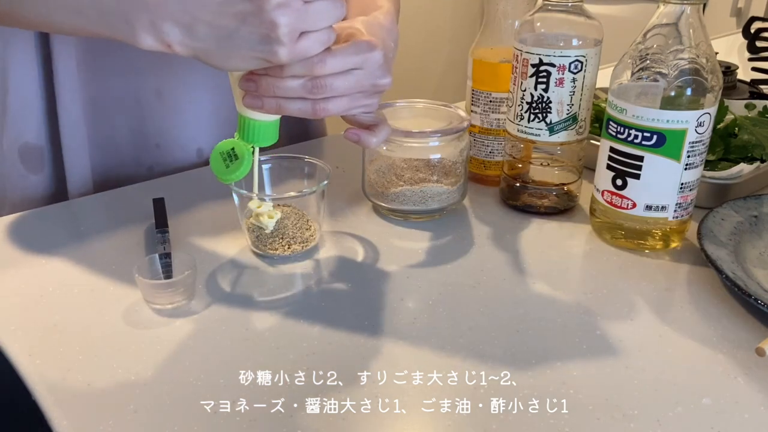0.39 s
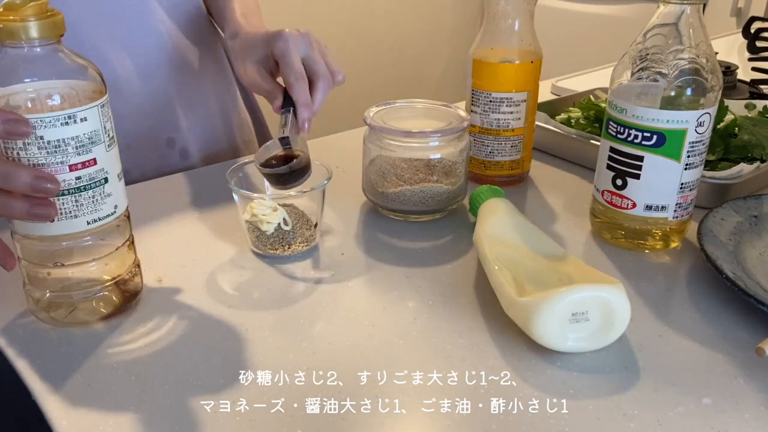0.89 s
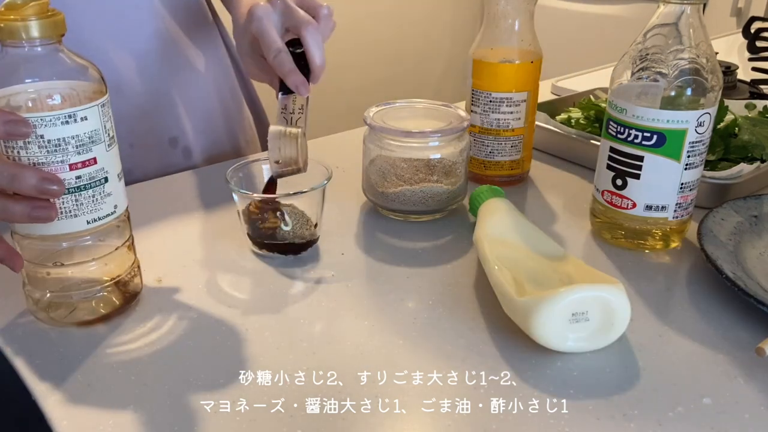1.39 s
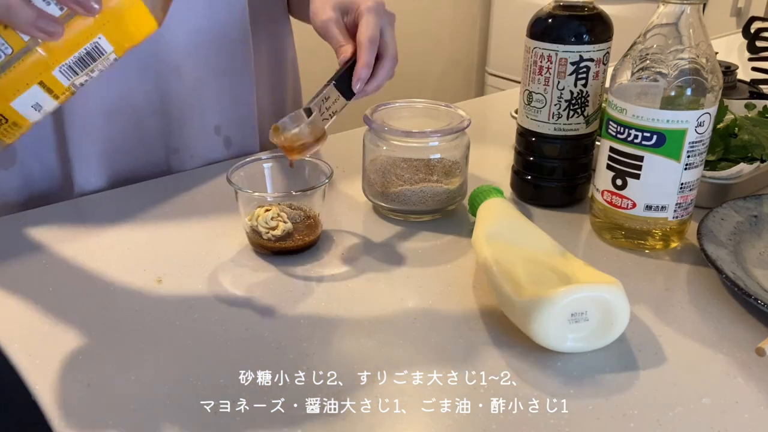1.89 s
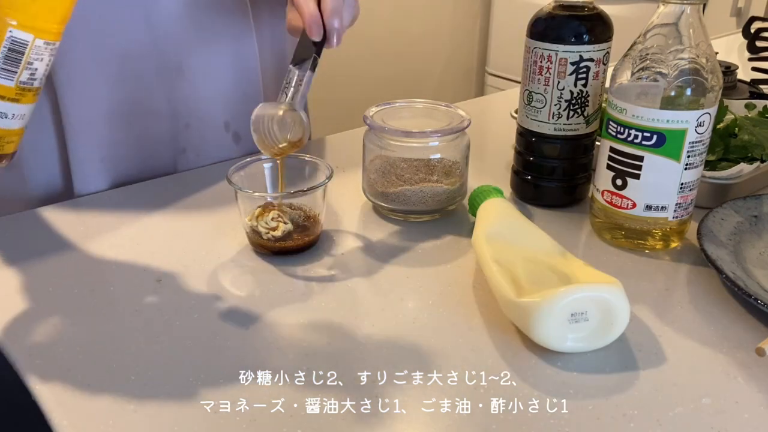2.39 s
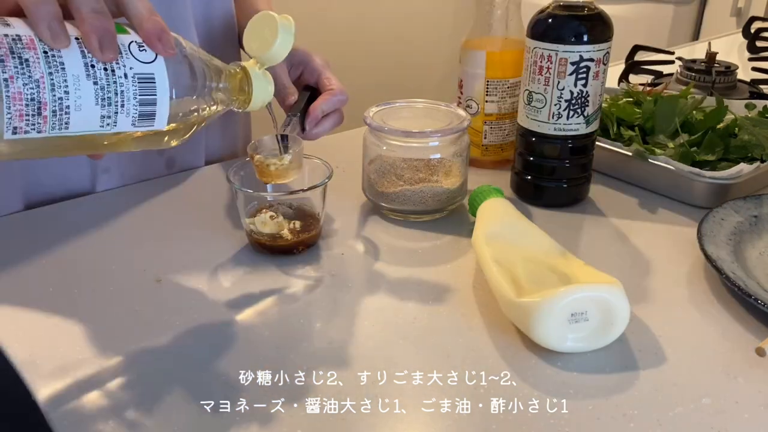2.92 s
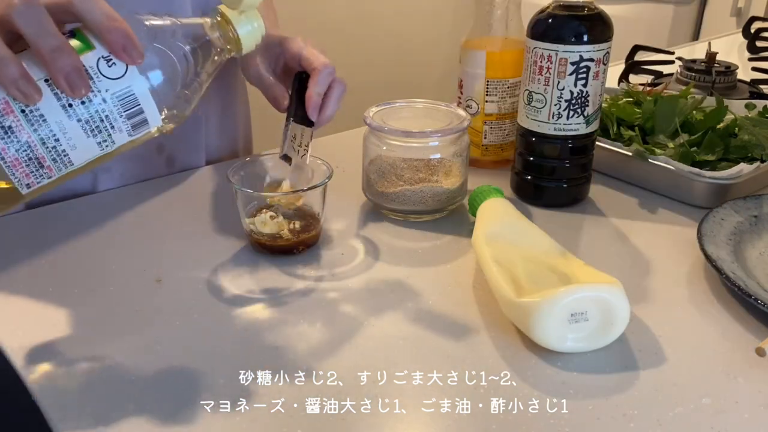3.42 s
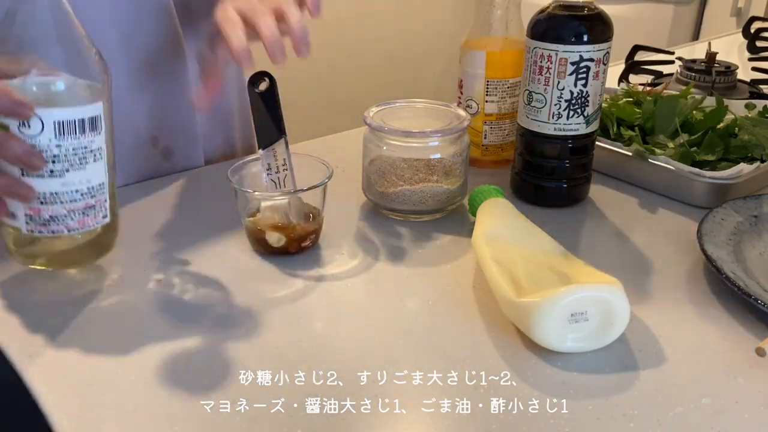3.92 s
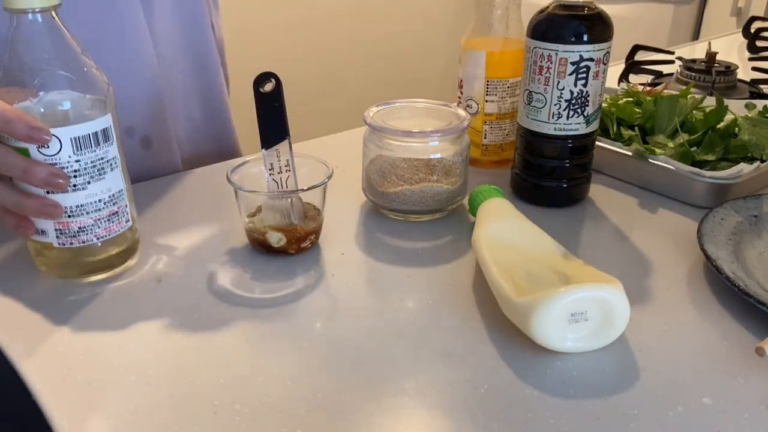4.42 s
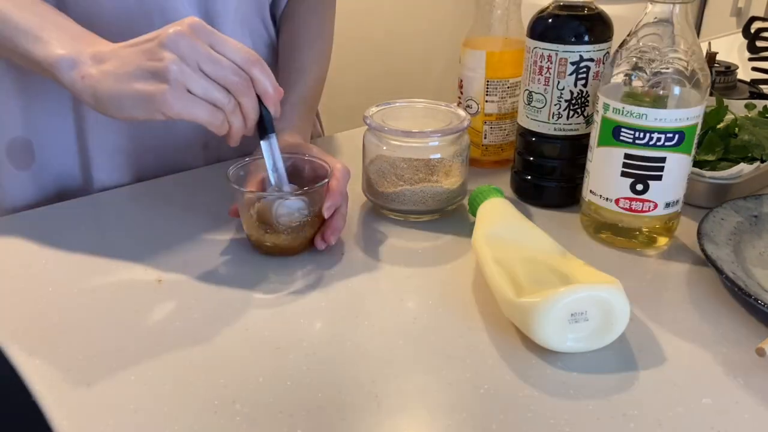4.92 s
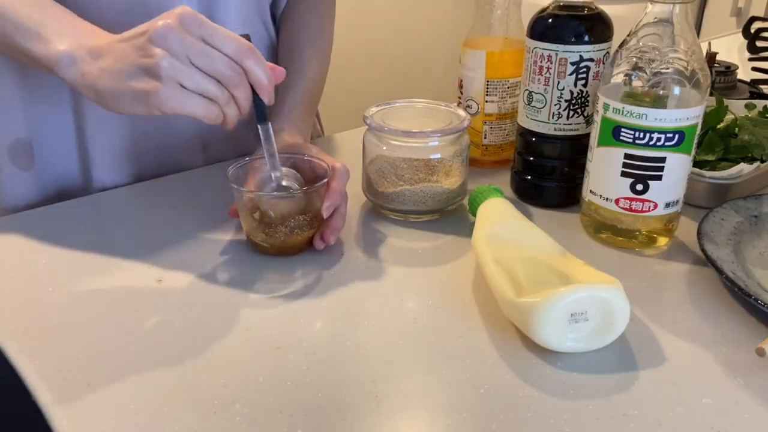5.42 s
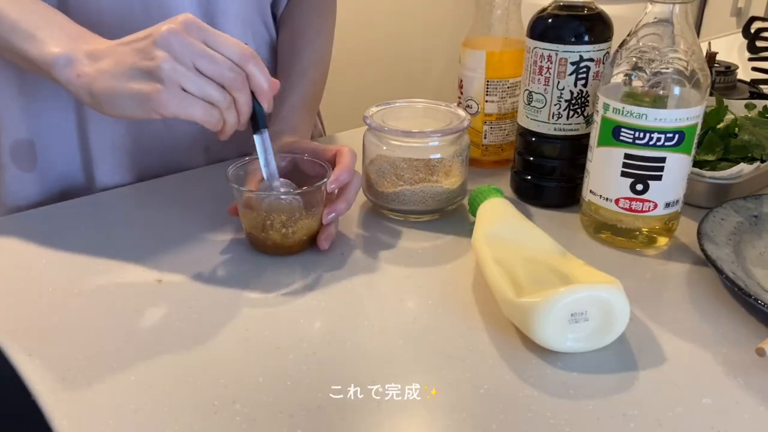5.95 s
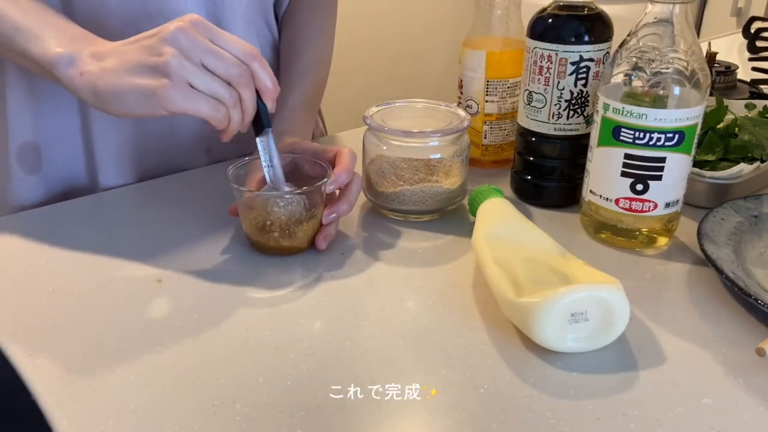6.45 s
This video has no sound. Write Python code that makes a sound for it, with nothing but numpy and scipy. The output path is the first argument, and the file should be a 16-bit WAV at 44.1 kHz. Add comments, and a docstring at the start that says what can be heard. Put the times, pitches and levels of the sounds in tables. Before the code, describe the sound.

A close stereo microphone hears a small, quiet kitchen with low bassy hum and a faint distant midrange wash. For the first 0.9 s there is little else. The background then steps down; a soft pouring hiss trickles away until about 1.6 s, with tiny ticks and a light spoon tap on glass at 1.7. After another cut at 1.9, faint pouring swells from 2.35, ending in a bright double knock at 2.83. A softer tap comes at 3.15 and a crisp clink at 3.75. At 4.02 a bottle lands with a loud, woody thud; at 4.4 it lands again, bouncing quickly to rest, with a faint jar ring. The ringing is chopped at 4.62 as the background rises. Gentle wet stirring and scraping continues to 6.5, with irregular glass clinks, strongest near 5.3-5.4 and 5.7, weaker taps near 6.1, 6.35 and the end.

```python
"""A measuring spoon knocks and stirs in a small glass cup on a kitchen counter: short rattles plus glass modes.
A bottle is set down twice, with bounces: the same model with modes of the counter and a neighbouring jar.
Shaped noise makes the pouring, stirring and quiet kitchen hum; faint ticks are decaying sines.
Five passages follow each other: hum and wash step in level, and what still rings is chopped off.
A close pair of microphone ports hears it all."""
import sys
import numpy as np
from scipy import signal
from scipy.fft import rfft, irfft, next_fast_len
from scipy.io import wavfile
from scipy.ndimage import uniform_filter1d

SR = 44100
rng = np.random.default_rng(int(sys.argv[2]) if len(sys.argv) > 2 else 0)


def how_loud(loudness_db):
    """Turn decibels into a plain amplitude multiplier (0 dB gives 1, 20 dB gives 10)."""
    steps = np.asarray(loudness_db, float) / 20
    return 10 ** steps


def transcribe(signal):
    """Save signal, clipped to [-1, 1], as a 16-bit WAV file at the path in sys.argv[1]."""
    frames = np.atleast_2d(signal).T
    limited = np.clip(frames, -1, 1)
    pcm = np.round(limited * 32767).astype(np.int16)
    wavfile.write(sys.argv[1], SR, pcm)


N = 289737


def evened(x):
    """Scales to rms 1."""
    return x / np.sqrt(np.mean(x ** 2) + 1e-20)


def read(points, hz):
    """Interpolates a (Hz, value) table on a log-frequency axis."""
    f, value = np.transpose(points)
    return np.interp(np.log(hz + 1), np.log(f + 1), value)


def diffuse(size, spectrum, patchy_db):
    """Noise from all sides: the ports agree only in part, band by band; its level drifts in patches."""
    # likeness of the ports: freq_hz, likeness [0-1]
    port_likeness = [(60, 1), (160, 0.97), (270, 0.99), (450, 0.11), (800, 0.19), (1500, 0.37),
                     (3300, 0.31), (6000, 1), (9000, 0.71)]
    frames, hz = size // 256 + 5, np.fft.rfftfreq(1024, 1 / SR)
    a, b, c, d, patches = rng.standard_normal((frames, 513, 5)).T
    patches = uniform_filter1d(patches, size=12, axis=0)
    patches = evened(uniform_filter1d(patches, size=14, axis=1))
    same = np.clip(read(port_likeness, hz), -1, 1)[:, None]
    left = a + 1j * b
    right = same * left + np.sqrt(1 - same ** 2) * (c + 1j * d)
    z = np.array([left, right]) * how_loud(read(spectrum, hz)[:, None] + patchy_db * patches)
    return evened(signal.istft(z, nperseg=1024, noverlap=768)[1][:, :size])


def room(wet_db):
    """Response: direct sound, then a diffuse tail whose bands die at their own speed."""
    # reverberation: freq_hz, t60_s
    room_t60 = [(60, 0.59), (200, 0.4), (1000, 0.33), (4000, 0.37), (8000, 0.36), (16000, 0.1)]
    size = SR // 2
    hz, t, z = signal.stft(diffuse(size, [(20, 0.017), (20000, 0.0043)], 0), SR, nperseg=256)
    decay = how_loud(-60 * t / read(room_t60, hz)[:, None])
    tail = signal.istft(z * decay, SR, nperseg=256)[1][:, :size]
    tail = tail * np.clip(np.arange(size) / SR / 0.0018 - 1, 0, 1)  # first walls answer after a few ms
    tail = how_loud(wet_db) * tail / np.linalg.norm(tail[0])
    tail[:, 0] = 1  # direct sound
    return tail


def kitchen_hum(hum_db):
    """Low steady hum: diffuse noise weighted to the bass, at the level given per sample."""
    # spectrum: freq_hz, level_db
    hum_spectrum = [(25, -31.5), (38, -3), (50, 3), (120, -5.5), (200, -11), (300, -12.5), (420, -13),
                    (640, -28.5), (1100, -32), (1700, -40), (2400, -40), (3600, -46.5), (6500, -51),
                    (12000, -56.5), (16000, -74)]
    return how_loud(hum_db) * diffuse(N, hum_spectrum, 1.5)


def distant_wash(wash_db):
    """Distant midrange wash: diffuse noise at the level given per sample."""
    # spectrum: freq_hz, level_db
    wash_spectrum = [(200, -11.5), (500, 3.5), (1000, 0.5), (1600, -12.5), (3000, -34.5), (6000, -37.5)]
    return how_loud(wash_db) * diffuse(N, wash_spectrum, 1.5)


def appliance_tones():
    """Narrow bands of noise: appliance tones that waver."""
    # tones: pitch_hz, level_db, width_hz
    tone_bands = [(126, -66, 10), (180, -69, 10), (402, -77, 8), (542, -82, 8), (3750, -100, 110),
                  (5950, -106, 50)]
    hz = np.fft.rfftfreq(N, 1 / SR)
    total = 0
    for pitch_hz, level_db, width_hz in tone_bands:
        noise = rfft(diffuse(N, [(20, 0), (20000, 0.056)], 0))
        band = np.exp(-((hz - pitch_hz) / width_hz) ** 2)
        total = total + how_loud(level_db) * evened(irfft(noise * band, N))
    return total


def rustle():
    """Grains and liquid: scrape and finer fizz; strokes rise fast, hold and fade over pouring and stirring."""
    # scrape spectrum: freq_hz, level_db
    scrape_spectrum = [(300, -31), (750, 2), (1400, -5), (1900, -8), (2350, 7), (2900, -11.5), (4100, -9),
                       (5500, -18), (8000, -34)]
    # fizz spectrum: freq_hz, level_db
    fizz_spectrum = [(4000, -27), (6000, 0.5), (9000, -1.5), (11500, 3), (14000, -0.5), (16000, 7.5)]
    # short strokes of hand or spoon: start_s, hold_s, scrape_db, fizz_db
    strokes = [(0.923, 0.0027, -73, -72.5), (1.583, 0.0042, -74.5, -60), (2.596, 0.076, -78, -77.5),
               (3.16, .005, -61, -100), (4.646, 0.022, -69, -77), (4.746, .01, -71, -100),
               (4.821, 0.076, -67.5, -82), (5.032, 0.019, -61, -71), (5.114, 0.0054, -63, -73),
               (5.455, 0.022, -74, -86), (5.856, 0.03, -78, -105), (5.985, 0.0067, -70, -68),
               (6.266, 0.0041, -75, -80), (6.338, 0.039, -64.5, -74), (6.522, 0.012, -74.5, -75)]
    # pouring that trickles off, pouring that swells, then a steady bed of stirring:
    # start_s, end_s, first_db, last_db
    pouring_and_stirring = [(0.913, 1.56, -71.5, -96.5), (2.347, 2.921, -87, -76.5),
                            (4.621, 6.57, -84, -86)]
    rise_db_per_s, scrape_fall_db_per_s, fizz_fall_db_per_s = 900, 235, 420
    bed_fizz_db, still_fizz_db = -14.5, -108  # against the bed's scrape; constant floor

    t = np.arange(N) / SR
    bed = 0
    for start_s, end_s, first_db, last_db in pouring_and_stirring:
        level_db = np.interp(t, [start_s, end_s], [first_db, last_db])
        bed = bed + how_loud(level_db) * (t >= start_s) * (t < end_s)
    scrape_power = bed ** 2
    fizz_power = (bed * how_loud(bed_fizz_db)) ** 2 + how_loud(still_fizz_db) ** 2
    for start_s, hold_s, scrape_db, fizz_db in strokes:
        before_s = np.maximum(start_s - t, 0)
        after_s = np.maximum(t - start_s - hold_s, 0)
        rise_db = -rise_db_per_s * before_s
        scrape_power = scrape_power + how_loud(scrape_db + rise_db - scrape_fall_db_per_s * after_s) ** 2
        fizz_power = fizz_power + how_loud(fizz_db + rise_db - fizz_fall_db_per_s * after_s) ** 2
    grain = how_loud(0.7 * evened(uniform_filter1d(rng.standard_normal(N), size=300)))
    scrape = np.sqrt(scrape_power) * diffuse(N, scrape_spectrum, 1.6)
    fizz = np.sqrt(fizz_power) * diffuse(N, fizz_spectrum, 2.1)
    return grain * (scrape + fizz)


def ticks():
    """Tiny clicks, each ringing for a few cycles."""
    # faint ticks: start_s, level_db, pitch_hz
    tick_rows = [(0.919, -64, 3980), (1.394, -58, 5760), (1.58, -44.5, 11300), (1.889, -53.5, 12000),
                 (2.628, -62, 10700), (2.992, -58.5, 5470), (3.29, -71.5, 13000), (3.378, -61, 6330),
                 (3.381, -68.5, 5250), (5.628, -64.5, 10900), (6.264, -55.5, 12230), (6.366, -57, 11000),
                 (6.385, -64, 11000), (6.449, -73, 11500), (6.505, -64, 11100), (6.521, -60, 11660),
                 (6.535, -65.5, 11700)]
    t = np.arange(400) / SR
    for start_s, level_db, pitch_hz in tick_rows:
        cycles = np.exp(-t * pitch_hz / 5.0) * np.sin(2 * np.pi * pitch_hz * t)
        yield start_s, how_loud(level_db) * (cycles + 0.58 * (t == 0)), 0


def blows(rows, colour, modes, burst_s, spread_s, bump_db, bass_db, upper_db):
    """Each blow is a short rattle, treble first as bending waves spread, plus the ringing of the given modes."""
    held_from_s = 4.62  # from here a hand holds the cup
    upper_per_treble = .45  # dB per dB: a brighter contact excites the upper modes more, until held
    even = .45  # share of the rattle's chance peaks levelled out, so few stray notes linger in the room
    lead_in, burst_size = 100, 2000  # samples

    t, hz = np.arange(SR // 2) / SR, np.fft.rfftfreq(SR // 2, 1 / SR)
    # delay = spread_s * (sqrt(500 / hz) - 1 / 6)
    late = np.exp(-4j * np.pi * spread_s * (np.sqrt(500 * hz) - hz / 12))
    bass = 1 / (1 + (hz / 450) ** 2)
    treble = 1 / (1 + (3500 / (hz + 1)) ** 2)
    apart_s = np.array([[.00001], [-.00001]])  # the ring reaches one port a little earlier
    times = np.array([row[0] for row in rows] + [N])  # N: no further contact
    chance = rng.standard_normal((len(rows), burst_size + len(modes)))
    for (start_s, peak_db, centre_hz, treble_db, ring_db), z in zip(rows, chance):
        bump = np.exp(-(np.log2((hz + 1) / centre_hz) / .32) ** 2)
        deep = np.log2(1500 / centre_hz)  # a duller blow carries more bass
        shape_db = read(colour, hz) + bump_db * bump + bass_db * deep * bass + treble_db * treble
        burst = np.pad(z[:burst_size] * np.exp(-t[:burst_size] / burst_s), (lead_in, 0))
        burst[lead_in] = 4.46  # the first contact is a sharp click
        rattle = rfft(burst, len(t))
        rattle = rattle / (abs(rattle) + 1) ** even
        burst = irfft(rattle * late * how_loud(shape_db), len(t))[:4096]
        burst = burst * np.clip((np.arange(4096) - 85) / 12, 0, 1)  # silence before the contact
        burst = burst / abs(signal.hilbert(burst)).max()

        held = int(start_s > held_from_s)
        ring = 0
        for (pitch_hz, mode_db, t60_s), chance_db in zip(modes, z[burst_size:]):
            level_db = mode_db + ring_db + chance_db
            if pitch_hz > 3000:
                level_db += upper_db[held] + upper_per_treble * treble_db * (1 - held)
            damping = 1.5 if held and pitch_hz < 3000 else 1  # fingers quieten the lowest modes
            decay = how_loud(level_db - 60 * t / t60_s * damping)
            ring = ring + decay * np.sin(2 * np.pi * pitch_hz * (t + apart_s))
        touched_s = times[times > start_s + .03][0] - start_s  # the next contact stops the ring
        ring = ring * (1 - np.exp(-t / .002)) * np.exp(-np.maximum(t - touched_s, 0) / 0.0016)
        ring = np.pad(ring, ((0, 0), (lead_in, 0)))[:, :len(t)]
        yield start_s - lead_in / SR, how_loud(peak_db) * burst, how_loud(peak_db) * ring


def spoon_knocks():
    """Spoon on glass: bright rattles and the cup's modes, the upper ones weaker once it is held."""
    # knocks: start_s, peak_db, centre_hz, treble_db, ring_db (against the peak)
    knock_rows = [(1.716, -34.5, 1260, 33, -23.5), (1.721, -38, 700, -37, -12.5),
                  (2.831, -18.5, 2390, 2, -16.5), (2.841, -20.5, 780, 16, -33), (2.85, -30, 935, 2, -36),
                  (3.149, -31, 730, -17.5, -22), (3.243, -55.5, 3360, 12, -38),
                  (3.751, -25, 2035, 12.5, -28.5), (3.756, -27.5, 753, 0, -37.5),
                  (4.742, -49, 705, -8, -28), (4.866, -52, 1600, -22, -13), (5.046, -52.5, 1405, -13, -28),
                  (5.11, -45.5, 750, -1, -45), (5.124, -44, 730, -12, -40), (5.298, -31.5, 2270, 29, -12),
                  (5.303, -31, 820, -11, -36), (5.377, -22, 1930, 16.5, -14), (5.399, -39.5, 664, -1, -20),
                  (5.634, -40, 2550, -18.5, -42), (5.69, -22.5, 2020, 10.5, -9.5),
                  (5.697, -30, 2140, 15, -47), (5.752, -20, 2560, -3, -28), (5.983, -41, 792, -18, -28),
                  (6.079, -38.5, 1320, 33.5, -28), (6.099, -42, 781, 2, -15), (6.331, -37, 1900, 29.5, -28),
                  (6.364, -47.5, 1753, -57.5, -27), (6.565, -39, 718, 10, -20)]
    # rattle spectrum: freq_hz, level_db
    knock_colour = [(100, -26), (250, 10), (700, 9), (1500, 5.5), (2400, -5.5), (3500, -15), (6000, -24),
                    (9000, -33.5), (12000, -37.5), (16000, -37)]
    # modes of the free cup: pitch_hz, level_db, t60_s
    glass_modes = [(1577, 0, .33), (1609, -4, .2), (2075, -7, .14), (2390, -10, .17), (4279, -2, .12),
                   (4287, -4, .33), (4328, -7, .28), (7960, -22, .1), (8045, -19, .22), (12620, -30, .15)]
    return blows(knock_rows, knock_colour, glass_modes, burst_s=0.005, spread_s=0.0032,
                 bump_db=12.0, bass_db=9.7, upper_db=[0, -10])  # free, held


def bottle_thuds():
    """Bottle set down, with bounces: dull rattles, the counter's low modes, and a jar near 3.9 kHz."""
    # thuds: start_s, peak_db, centre_hz, treble_db, ring_db (against the peak)
    thud_rows = [(4.024, -6.5, 756, 0.5, -18.5), (4.032, -18, 479, -12, -25),
                 (4.251, -40.5, 374, -13.5, -7.5), (4.373, -49.5, 451, -20.5, -26),
                 (4.4, -7.5, 560, 7, -20), (4.409, -12.5, 500, -27, -14.5),
                 (4.432, -14.5, 596, -13.5, -12.5), (4.474, -20, 450, -55, -14)]
    # rattle spectrum: freq_hz, level_db
    thud_colour = [(40, -49), (100, -5.5), (220, -4), (600, 7), (1200, 1.5), (2200, -4.5), (3500, -16.5),
                   (6000, -29), (10000, -35.5), (16000, -42)]
    # the counter's low modes, and a neighbouring jar ringing near 3.9 kHz: pitch_hz, level_db, t60_s
    counter_and_jar_modes = [(60, -8, .55), (97, -6, .35), (183, -4, .5), (225, -2, .2), (335, -4, .15),
                             (375, -2, .2), (555, -3, .15), (624, -3, .18), (845, -7, .15), (1140, -8, .15),
                             (3868, -29, .3), (3893, -26, .35)]
    return blows(thud_rows, thud_colour, counter_and_jar_modes, burst_s=0.0044, spread_s=0.00402,
                 bump_db=1, bass_db=2.8, upper_db=[-2])


def scene():
    """Every blow sounds in the room until its passage ends; the long rings are heard directly."""
    # passages, each up to the next start: start_s, hum_db, wash_db
    passages = [(0, -57.5, -71), (.917, -59.5, -85), (1.902, -61, -80.5), (2.917, -58, -91.5),
                (4.62, -56.5, -74.5)]
    starts_s, hum_db, wash_db = np.transpose(passages)
    ends = np.round(np.append(starts_s[1:], N / SR) * SR).astype(int)
    passage = np.searchsorted(ends, np.arange(N), "right")
    mix = kitchen_hum(hum_db[passage]) + distant_wash(wash_db[passage]) + appliance_tones() + rustle()
    rooms = [room(-5.0) for _ in range(8)]
    hits = [*spoon_knocks(), *bottle_thuds(), *ticks()]
    for k, (start_s, sound, ring) in enumerate(hits):
        at = round(start_s * SR)
        end = ends[passage[min(at + 200, N - 1)]]
        heard = signal.fftconvolve(sound[None], rooms[k % 8], axes=1)[:, :SR // 2] + ring
        heard = heard[:, :end - at]
        mix[:, at:at + heard.shape[1]] += heard
    return mix


def band_limit(x):
    """A steep low-pass at the top of the band."""
    return signal.sosfilt(signal.butter(12, 16680, fs=SR, output="sos"), x)


def record(dry):
    """The two ports drift apart in phase toward the treble; both ends of the band roll off."""
    # phase by which the left port leads: freq_hz, lead_rad
    left_lead = [(100, 0), (2000, .1), (5200, .7), (6800, 2.8), (7900, 3.5), (9800, 6.1), (10900, 6.4),
                 (12800, 9.1), (14200, 9.6), (15300, 12.3), (16300, 12.9)]
    # band limits: low_hz, high_hz
    band_limits = [40, 15900]
    low_hz, high_hz = band_limits
    size = next_fast_len(N + 4096)
    hz = np.fft.rfftfreq(size, 1 / SR)
    turn = np.exp(.5j * read(left_lead, hz))  # half the lead to each port
    band = hz ** 4 / (hz ** 4 + low_hz ** 4) / (1 + (hz / high_hz) ** 60)
    ports = irfft(rfft(dry, size) * band * np.array([turn, 1 / turn]), size)[:, :N]
    return band_limit(ports)


dry = scene()
out = record(dry)
transcribe(out)
```